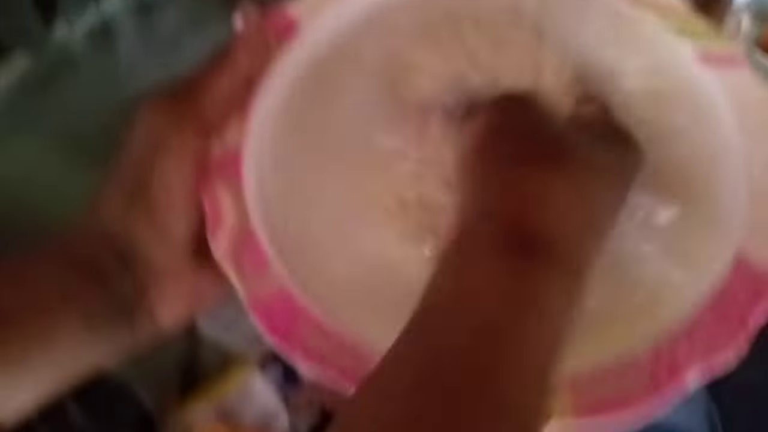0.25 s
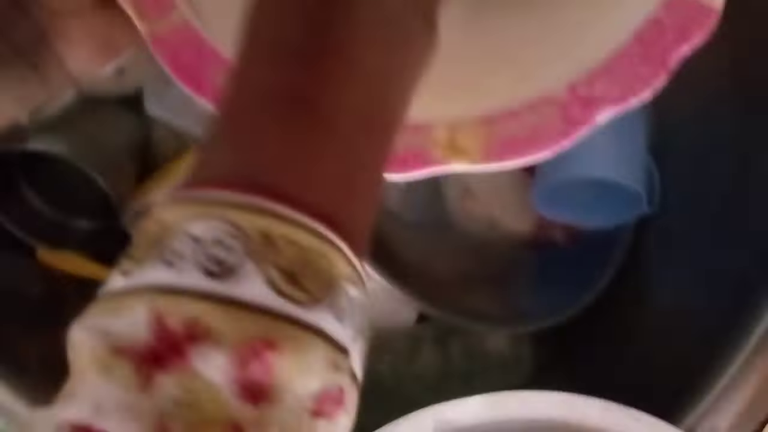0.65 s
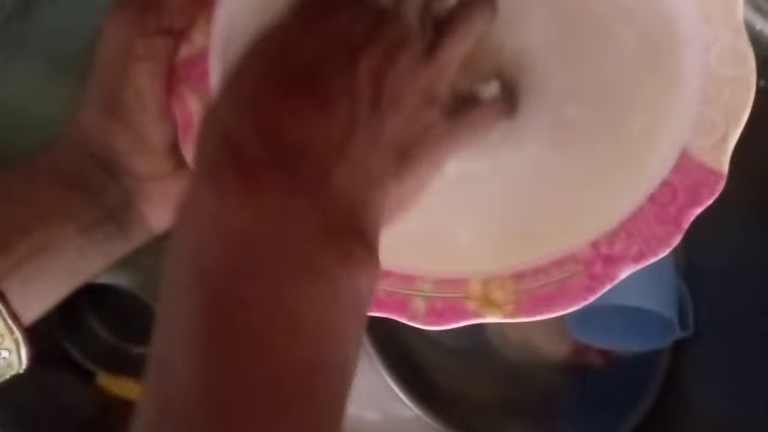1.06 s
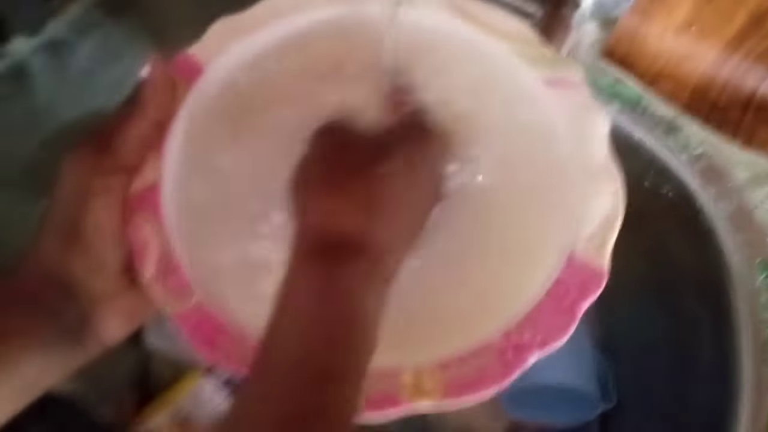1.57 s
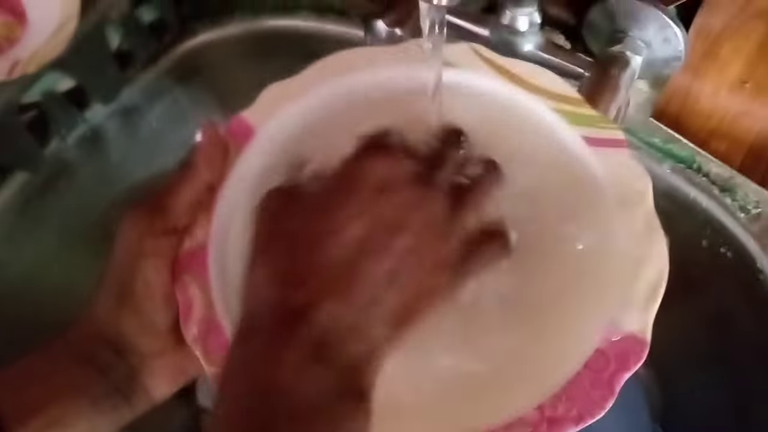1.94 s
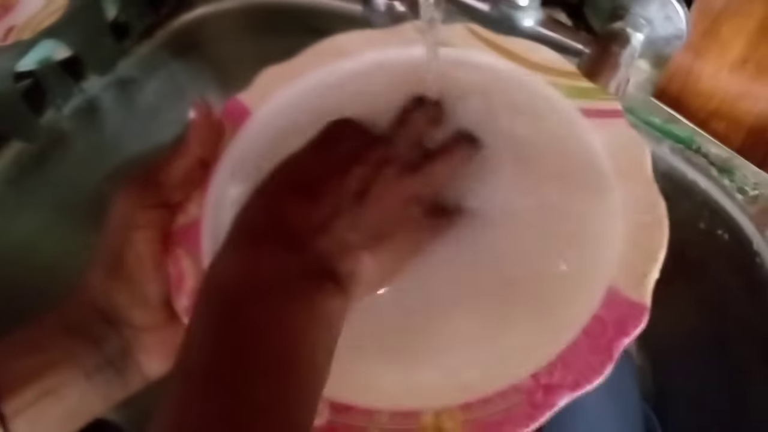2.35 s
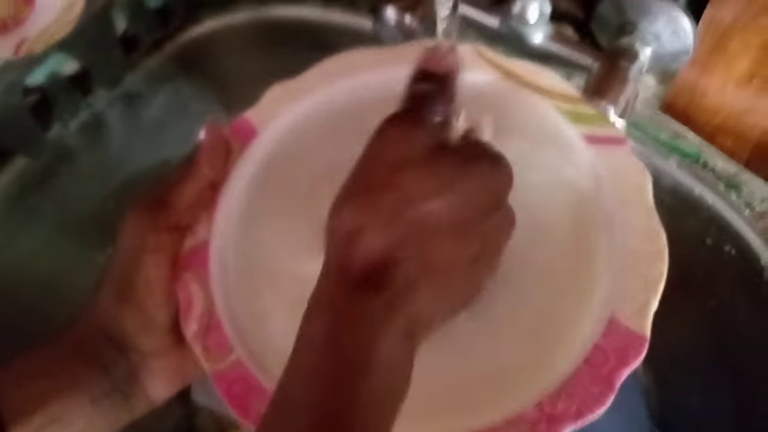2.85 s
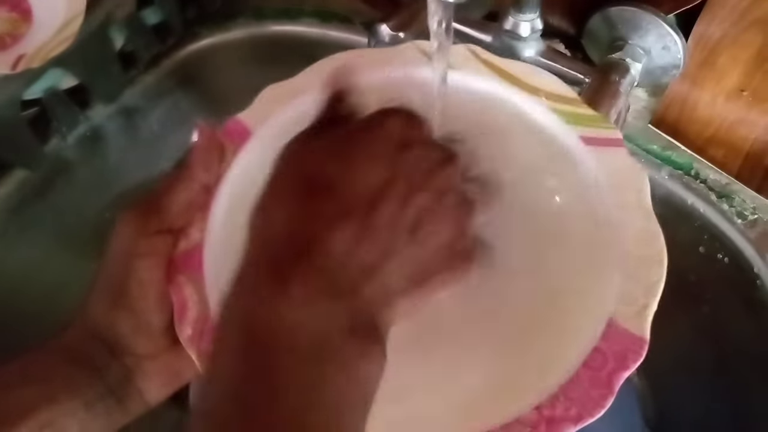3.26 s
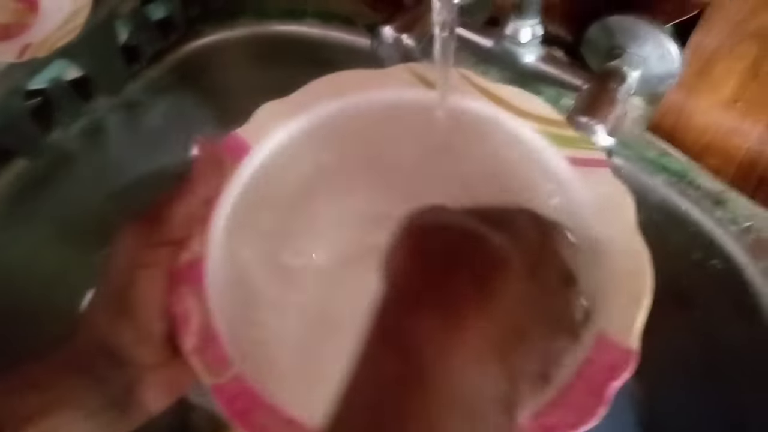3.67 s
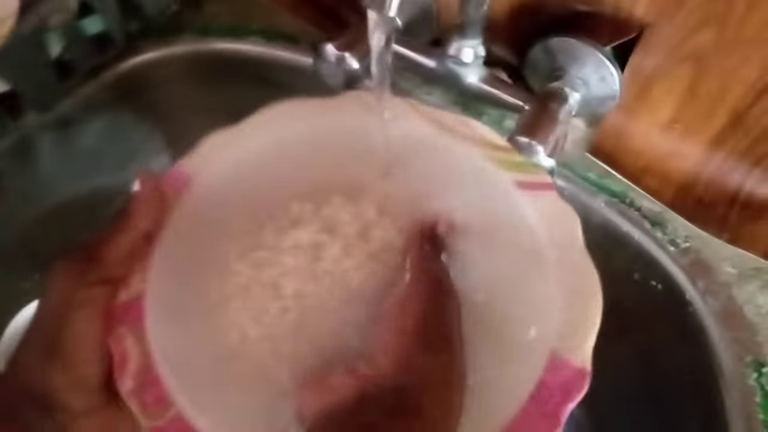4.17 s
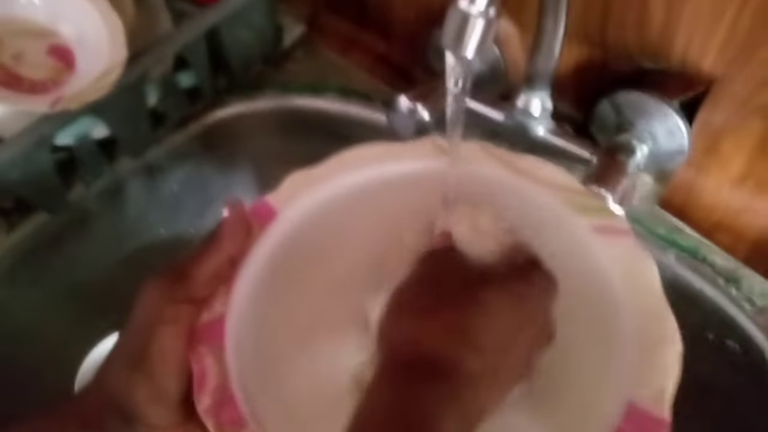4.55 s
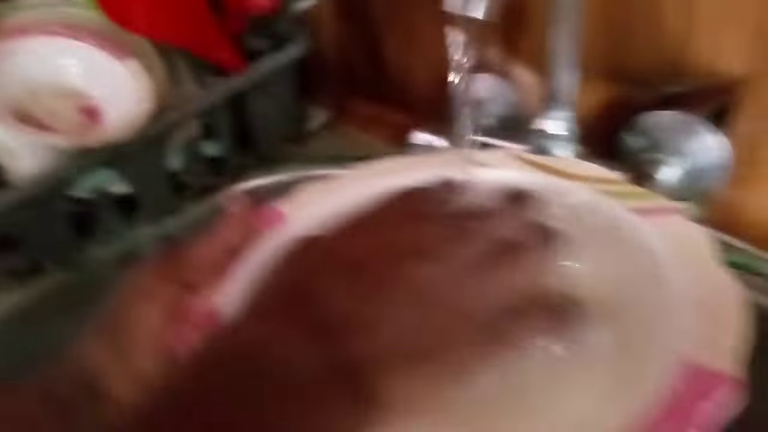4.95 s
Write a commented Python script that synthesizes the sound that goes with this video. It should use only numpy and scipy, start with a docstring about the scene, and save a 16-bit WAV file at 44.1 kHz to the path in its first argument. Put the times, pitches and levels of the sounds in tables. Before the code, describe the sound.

Close to a kitchen sink, a hand stirs rice in a bowl of water under a thin tap stream. Splashes come in uneven bursts; early on, water briefly drums on the steel. A calmer gap follows, then busier swishing with bright plinks, a sharp knock-like one past three seconds, a lull, and crisp splashes to the end. Faint low hum underneath.

```python
"""Rice is swished by hand in a bowl of water under a running tap, heard from close above a steel sink.
Throughout, steady low tones and a rumble sit under the tap's fizz, and strokes churn clouds of ringing bubbles.
From 0.4 s, water drums on the steel for half a second: rough noise through the metal's resonances.
Slaps of filtered noise and single decaying bubbles punctuate the strokes; near 3.3 s a tiny bubble rings
as sharply as a knock. Short noise tails make the sink and the kitchen answer the water."""
import sys
import numpy as np
from scipy import signal
from scipy.fft import rfft, irfft, next_fast_len
from scipy.io import wavfile
from scipy.ndimage import map_coordinates

SR = 44100
rng = np.random.default_rng(int(sys.argv[2]) if len(sys.argv) > 2 else 0)


def generate_wav(signal):
    """Clip the signal to [-1, 1] and save it as 16-bit WAV at the path in sys.argv[1]."""
    frames = np.transpose(np.atleast_2d(signal))
    scaled = np.clip(frames, -1, 1) * 32767
    pcm = np.round(scaled).astype(np.int16)
    wavfile.write(sys.argv[1], SR, pcm)


N = 229792

# Steady low tones: kitchen hum, and a faint bowl or sink tone at 262 Hz: (frequency [Hz], mean level [dB])
LOW_TONES = [(50.1, -85.5), (100.3, -74.5), (150.3, -70.5), (200.3, -76.5), (262, -82)]
# Tone colour of the kitchen rumble: (frequency [Hz], relative gain [dB])
RUMBLE_COLOUR = [(20, -20), (36, -40), (50, -6.5), (75, 0.5), (120, 6), (170, -1), (260, -11.5), (320, -9),
                 (600, -12.5), (2000, -9), (8000, -34), (13000, -23.5)]
# Tone colour of the tap stream: (frequency [Hz], relative gain [dB])
STREAM_COLOUR = [(600, 10.5), (1200, -10), (2100, 2), (3500, -24), (4500, -9), (6300, 17), (7800, 10.5),
                 (9400, 16), (11500, 8), (13600, -41), (15000, -25), (17000, -31)]
# Resonances of the sink steel: (frequency [Hz], bandwidth [Hz], relative level [dB])
STEEL_MODES = [(580, 55, -3), (766, 140, -13), (2130, 29, 6), (2496, 78, -1.5), (2880, 120, -5.5),
               (3100, 52, -8), (3460, 200, -7)]
# Tone colours of sloshing, gurgling and spraying water: (frequency [Hz], relative gain [dB])
SLOSH_COLOUR = [(120, -33.5), (200, -1.5), (265, 1), (320, -12), (420, -10.5), (520, 2.5), (800, 5.5),
                (1100, 10.5), (1500, 4), (2500, -21.5)]
GURGLE_COLOUR = [(500, -20), (900, -13), (1300, -4.5), (2000, 5.5), (3100, 7.5), (3800, 7.5), (4500, -7),
                 (5500, -27)]
SPRAY_COLOUR = [(1000, -36), (3500, -13), (4500, -12.5), (5400, -2), (6300, 6.5), (7000, 3), (8000, -1.5),
                (9500, 1.5), (11200, -5), (13300, -18), (15500, -15.5), (17000, -60)]
# Sweeps of the hand, levels before attack and sag:
# (time [s], length [s], slosh level [dB], bubbling level [dB], spray level [dB])
STROKES = [(0.0, 0.028, -63, -49.5, -52.5), (0.19, 0.043, -74, -52.5, -45),
           (0.299, 0.066, -57.5, -51, -41.5), (0.405, 0.056, -59.5, -62, -47.5),
           (0.606, 0.13, -65, -45.5, -45.5), (0.734, 0.085, -73, -45, -42),
           (0.877, 0.037, -63, -47.5, -42.5), (0.94, 0.026, -68, -52.5, -55),
           (1.493, 0.13, -65.5, -74, -64), (1.645, 0.05, -86, -46.5, -42.5),
           (1.709, 0.053, -72, -43.5, -46), (1.796, 0.029, -55, -45, -41.5), (1.857, 0.2, -73, -46.5, -44),
           (2.207, 0.027, -68, -52, -57), (2.413, 0.065, -73, -49, -52.5), (2.605, 0.067, -60, -51, -47.5),
           (2.681, 0.045, -70, -46.5, -40), (2.752, 0.043, -68.5, -42.5, -39),
           (2.912, 0.079, -69, -46, -43), (3.049, 0.14, -63, -46, -42), (3.161, 0.078, -56, -46, -48.5),
           (3.319, 0.03, -64, -42.5, -42), (3.77, 0.062, -62.5, -55.5, -48),
           (3.912, 0.024, -60.5, -65, -56.5), (4.081, .03, -59, -59.5, -55.5),
           (4.26, 0.25, -78, -61, -49.5), (4.39, 0.046, -42, -55, -46.5), (4.416, 0.014, -48, -51, -36.5),
           (4.508, 0.036, -50, -52, -43.5), (4.625, 0.16, -66, -53, -48.5), (4.728, 0.089, -49, -45, -34),
           (4.855, 0.021, -58, -46.5, -48), (4.91, 0.028, -73, -46, -41.5), (5.115, 0.027, -64, -47, -46)]
# Water still swirling between sweeps: (slosh level [dB], bubbling level [dB], spray level [dB])
SWIRL_DB = [-73.5, -62, -59.5]
# Water slapping the hand and the bowl, levels before envelope and echoes:
# (time [s], smack level [dB], gulp level [dB], spray level [dB])
SLAPS = [(0.137, -42, -72, -34), (0.326, -35.5, -58, -45), (0.63, -34.5, -72, -37.5),
         (0.807, -40, -51, -34), (0.901, -44, -56, -37), (1.241, -47, -60, -40), (1.338, -47, -60, -39),
         (1.657, -51, -76, -32), (1.946, -39, -72, -28), (1.969, -37, -41, -53), (2.022, -28, -66, -31.5),
         (2.456, -59, -68, -35), (2.704, -30.5, -73, -32), (3.039, -34.5, -40.5, -33),
         (3.157, -34, -44, -32), (3.835, -58, -51, -49), (3.969, -49, -69, -41.5), (4.284, -45, -73, -37.5),
         (4.398, -55, -36, -44), (4.426, -56, -37.5, -25), (4.521, -58, -48, -31.5), (4.757, -43, -47, -24),
         (4.794, -33, -66, -23), (5.148, -44, -78, -31)]
# The largest single bubbles: (time [s], starting pitch [Hz], peak level before echoes [dB], 60 dB decay [s])
BUBBLES = [(0.139, 2180, -31.5, 0.004), (0.218, 6200, -34, 0.0094), (0.326, 1460, -30.5, 0.01),
           (0.339, 2320, -28.5, .009), (0.353, 3830, -15.5, 0.0055), (0.653, 1320, -35, 0.034),
           (0.7, 1750, -26, 0.013), (0.714, 1170, -31, 0.01), (0.742, 3370, -28, .02),
           (0.744, 8200, -21.5, .018), (1.051, 1390, -42, .014), (1.243, 2550, -39, .006),
           (1.337, 2190, -23.5, 0.008), (1.694, 3350, -27.5, 0.0044), (1.759, 1880, -33, 0.0037),
           (1.839, 1112, -40.5, 0.065), (1.84, 7600, -20.5, 0.0028), (1.947, 5850, -20.5, 0.0046),
           (1.958, 2230, -34, 0.053), (1.969, 810, -37.5, 0.077), (1.979, 997, -41, .03),
           (2.023, 3110, -23.5, 0.012), (2.116, 3130, -28, 0.056), (2.221, 1810, -42.5, 0.011),
           (2.456, 6200, -30.5, 0.017), (2.529, 2940, -37.5, 0.037), (2.682, 2070, -26.5, 0.0039),
           (2.698, 2790, -27.5, 0.013), (2.708, 3020, -26.5, 0.056), (2.737, 3040, -26.5, 0.035),
           (2.753, 5720, -22, 0.0035), (2.771, 2360, -29.5, 0.01), (2.79, 5000, -28.5, 0.0049),
           (2.861, 2060, -33.5, 0.014), (2.941, 1100, -40, .04), (3.04, 600, -33, .013),
           (3.088, 4530, -27, 0.0054), (3.159, 1620, -32, 0.011), (3.186, 683, -43, 0.058),
           (3.187, 2960, -34, 0.021), (3.218, 1310, -33.5, 0.0048), (3.285, 6040, -9, 0.013),
           (3.331, 1091, -32.5, 0.047), (3.374, 2740, -32, 0.0095), (3.585, 1270, -39, 0.01),
           (3.936, 1790, -41, 0.046), (4.092, 840, -44.5, 0.013), (4.168, 2210, -37, 0.029),
           (4.267, 2206, -40.5, 0.039), (4.428, 900, -38.5, 0.042), (4.52, 740, -41, 0.018),
           (4.547, 5730, -26.5, 0.023), (4.659, 1510, -35.5, 0.011), (4.738, 6600, -14, .007),
           (4.803, 1474, -30.5, 0.023), (4.901, 2350, -28, 0.0033), (4.932, 1950, -31, 0.014),
           (5.059, 1800, -32, 0.012), (5.126, 3100, -29.5, .018), (5.148, 6800, -16.5, 0.0054),
           (5.186, 2350, -21, 0.014)]

RUMBLE_DB = -64.5
RUNOFF_S, RUNOFF_LENGTH_S, RUNOFF_DB = 0.396, 0.48, -50
ATTACK_S, SAG_DB_PER_S, SETTLE_DB_PER_S = 0.013, 31.5, 116  # a sweep builds, slackens, then settles
CHURN_DB, CHURN_PER_S = 1.5, 45  # unevenness of the stirring
STRAYS_PER_S, STRAY_DB, STRAY_SPREAD_DB = 30, 9, 1  # lesser bubbles, peaks relative to the bubbling
STRAY_LOW_HZ, STRAY_HIGH_HZ, STRAY_CYCLES = 1302, 4060, 47  # mean 60 dB decay, in cycles
DROPLET_DB = -6.5  # relative to the spray
TOP_HZ = 15950


def amp(db):
    """Linear gain from decibels."""
    return 10 ** (np.asarray(db) / 20)


def unit(x):
    """Scale to an RMS of one."""
    return x / np.sqrt(np.mean(x ** 2) + 1e-20)


def wobble(rate):
    """A smooth random curve, rate knots a second."""
    knots = rng.standard_normal(int(N * rate / SR) + 4)
    return map_coordinates(knots, [np.arange(N) * rate / SR])


def filtered(x, response):
    """Shape the spectrum of x with a complex response of frequency."""
    size = next_fast_len(len(x) + SR // 10)
    spectrum = rfft(x, size) * response(np.fft.rfftfreq(size, 1 / SR))
    return irfft(spectrum, size)[:len(x)]


def coloured(x, points, size=8192):
    """Tint x with a minimum-phase filter drawn through (frequency [Hz], gain [dB]) points."""
    hz, db = np.transpose(points)
    log_grid = np.log(np.fft.rfftfreq(size, 1 / SR) + 1)
    gain = amp(np.interp(log_grid, np.log(hz), db))
    # Keeping only the causal half of the cepstrum makes the filter minimum-phase.
    cepstrum = irfft(np.log(gain))[:size // 2]
    cepstrum[0] /= 2
    impulse = irfft(np.exp(rfft(2 * cepstrum, size)))
    return signal.fftconvolve(x, impulse)[:len(x)]


def add(track, s, sound):
    """Mix a sound into the track at time s [s]."""
    start = int(np.clip(round(s * SR), 0, N))
    track[start:start + len(sound)] += sound[:N - start]


def swell(s, length, attack, sag_db, settle_db):
    """A gain that rises at s, sags through the push, then dies away faster; slopes in dB a second."""
    t = np.maximum(np.arange(N) / SR - s, 0)
    fall_db = sag_db * t + settle_db * np.maximum(t - length, 0)
    return np.minimum(t / attack, 1) * amp(-fall_db)


def echoed(x, sink_db, sink_t60=0.063, room_db=-14, room_t60=0.34, gap=0.00091):
    """Near steel walls and then the kitchen answer with decaying noise tails, drawn afresh each time."""
    t = np.arange(SR // 4) / SR
    out = np.pad(x, (0, len(t) - 1))
    for db, t60 in ((sink_db, sink_t60), (room_db, room_t60)):
        fade_in = np.clip(t / gap - 1, 0, 1)  # silent until the first reflection
        tail = rng.standard_normal(len(t)) * amp(-60 * t / t60) * fade_in
        wet = signal.fftconvolve(x, tail)
        balance = np.linalg.norm(x) / (np.linalg.norm(wet) + 1e-20)
        out = out + wet * amp(db) * balance
    return out


def in_sink(x, sink_db, count=60):
    """A running sound echoed in equal pieces, each with a freshly drawn noise tail."""
    out = np.zeros(N)
    for part in np.array_split(np.arange(N), count):
        add(out, part[0] / SR, echoed(x[part], sink_db))
    return out


def ring(t, hz, t60, rise, onset_cycles):
    """A bubble swells in, then dies while its pitch rises on the way to the surface."""
    onset = 1 - np.exp(-(t * hz / onset_cycles) ** 2)
    cycles = hz * (t + rise * t * t / (2 * t60))
    return onset * amp(-60 * t / t60) * np.sin(2 * np.pi * cycles)


def cloud(rate, low_hz, high_hz, cycles, spread_db, size=600):
    """Many small bubbles ring at random moments, rate a second; few are strong."""
    draws = rng.random((int(rate * N / SR), 4))
    when, pitch, strength, life = draws.T[:, :, None]
    hz = low_hz * (high_hz / low_hz) ** pitch
    rarity = -np.log(strength + .03)  # the offset caps the strongest
    t60 = cycles * (.5 + life) / hz
    rings = ring(np.arange(size) / SR, hz, t60, rise=0.088, onset_cycles=0.44)
    waves = amp(spread_db * rarity) * rings
    places = (when * N).astype(int) + np.arange(size)
    return unit(np.bincount(places.ravel(), waves.ravel(), N)[:N])


def kitchen():
    """A steady low rumble of coloured noise, and low tones that drift slightly in level and phase."""
    t = np.arange(N) / SR
    tones = np.zeros(N)
    for hz, db in LOW_TONES:
        level = amp(db + 3.5 * wobble(5.8)) * np.sqrt(2)  # RMS to peak
        tones += level * np.sin(2 * np.pi * hz * t + 0.57 * wobble(3.74))
    rumble = unit(coloured(rng.standard_normal(N), RUMBLE_COLOUR))
    return tones + amp(RUMBLE_DB) * rumble


def tap():
    """The thin stream enters the water with a faint, gently fluttering fizz of tiny bubbles."""
    fizz = cloud(rate=2000, low_hz=940, high_hz=14600, cycles=9.4, spread_db=5.5, size=300)
    level_db = -59.5 + 1.5 * wobble(9)
    return amp(level_db) * unit(in_sink(coloured(fizz, STREAM_COLOUR), sink_db=2))


def steel_response(hz):
    """Resonances of the sink metal, summed with alternating polarity."""
    total = 0
    for k, (centre, width, db) in enumerate(STEEL_MODES):
        damping = 1j * hz * width
        total = total + (-1) ** k * amp(db) * damping / (centre ** 2 - hz ** 2 + damping)
    return total


def runoff():
    """A thread of water, as roughly fluctuating noise, patters on the sink and rings its steel."""
    patter = rng.standard_normal(N) * amp(3.1 * wobble(300))
    flow = swell(RUNOFF_S, RUNOFF_LENGTH_S, attack=0.035, sag_db=1.5, settle_db=63)
    return amp(RUNOFF_DB) * flow * unit(filtered(patter, steel_response))


def stirring():
    """Gains of slosh, bubbling and spray: sweeps add in power to the swirl, each layer a little unevenly."""
    power = amp(SWIRL_DB)[:, None] ** 2
    for s, length, *levels_db in STROKES:
        push = swell(s, length, ATTACK_S, SAG_DB_PER_S, SETTLE_DB_PER_S)
        power = power + (amp(levels_db)[:, None] * push) ** 2
    return [gain * amp(CHURN_DB * wobble(CHURN_PER_S)) for gain in np.sqrt(power)]


def droplets(spray_gain):
    """Single droplets tick clear of the spray as short, high rings."""
    ticks = cloud(rate=70, low_hz=4980, high_hz=11900, cycles=58, spread_db=7.0, size=500)
    return amp(DROPLET_DB) * spray_gain * unit(echoed(ticks, sink_db=-4.5)[:N])


def strays(bubbling_gain):
    """Rows of lesser bubbles at random moments and pitches, as strong as the water is stirred."""
    when, pitch, strength, life = rng.random((int(STRAYS_PER_S * N / SR), 4)).T
    hz = STRAY_LOW_HZ * (STRAY_HIGH_HZ / STRAY_LOW_HZ) ** pitch
    stirred_db = 20 * np.log10(bubbling_gain[(when * N).astype(int)])
    db = stirred_db + STRAY_DB + STRAY_SPREAD_DB * (2 * strength - 1)
    t60 = STRAY_CYCLES * (.5 + life) / hz
    return np.transpose([when * N / SR, hz, db, t60])


def bubbles(rows, satellite_db=-16, scatter=0.236, lag=.004, count=4):
    """Air trapped by the fingers pinches off and rings; weaker bubbles of other sizes break off with it."""
    out, t = np.zeros(N), np.arange(SR // 12) / SR
    for s, hz, db, t60 in rows:
        plink = ring(t, hz, t60, rise=0.0079, onset_cycles=3.3)
        size, delay = rng.random((2, count, 1))
        other_t = np.maximum(t - lag * delay, 0)
        other_hz = hz * np.exp(scatter * (2 * size - 1))
        others = ring(other_t, other_hz, t60, rise=0.24, onset_cycles=0.99)
        pocket = plink + amp(satellite_db) * others.sum(axis=0)
        add(out, s, amp(db) * echoed(pocket / np.abs(pocket).max(), sink_db=-3.5))
    return out


def slaps():
    """Water lands with a soft smack, a hollow gulp and a burst of droplets, all decaying coloured noise."""
    out, t = np.zeros(N), np.arange(SR // 10) / SR
    onset = 1 - np.exp(-t / .0007)

    def burst(colour, db, t60):
        """Coloured noise with a quick onset and exponential decay."""
        noise = coloured(rng.standard_normal(len(t)), colour)
        return amp(db) * unit(noise) * onset * amp(-60 * t / t60)

    for s, smack_db, gulp_db, spray_db in SLAPS:
        gulp = burst(SLOSH_COLOUR, gulp_db, t60=0.077)
        smack = burst(GURGLE_COLOUR, smack_db, t60=0.041)
        spray = burst(SPRAY_COLOUR, spray_db, t60=0.031)
        add(out, s, echoed(gulp + smack + spray, sink_db=-5))
    return out


def stirred_water(slosh_gain, bubbling_gain, spray_gain):
    """The hand churns the bowl: large pockets slosh, middling bubbles gurgle, droplets and rice crackle."""
    pockets = cloud(rate=1400, low_hz=200, high_hz=1700, cycles=9, spread_db=1.8, size=1200)
    gurgle = cloud(rate=900, low_hz=921, high_hz=4370, cycles=17.5, spread_db=3.0, size=900)
    crackle = cloud(rate=1300, low_hz=3340, high_hz=16940, cycles=14.3, spread_db=5.0, size=240)
    fizz = cloud(rate=1700, low_hz=5120, high_hz=12200, cycles=16, spread_db=11, size=300)
    fine_spray = coloured(crackle + amp(-11.5) * fizz, SPRAY_COLOUR)
    slosh = slosh_gain * unit(coloured(pockets, SLOSH_COLOUR))
    bubbling = bubbling_gain * unit(in_sink(coloured(gurgle, GURGLE_COLOUR), sink_db=2))
    spray = spray_gain * unit(in_sink(fine_spray, sink_db=3.0))
    return slosh + bubbling + spray


def scene():
    """Stirring drives the churned water, lesser bubbles and droplets; tap and kitchen run throughout."""
    slosh, bubbling, spray = stirring()
    background = kitchen() + tap() + runoff()
    details = droplets(spray) + bubbles(strays(bubbling)) + bubbles(BUBBLES) + slaps()
    return (background + details + stirred_water(slosh, bubbling, spray))[None]


def record(dry):
    """A steep low-pass removes everything from the band limit up."""
    return np.array([filtered(channel, lambda hz: hz < TOP_HZ) for channel in dry])


dry = scene()
out = record(dry)
generate_wav(out)
```